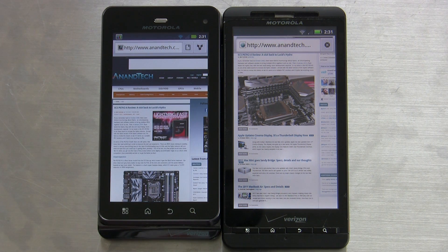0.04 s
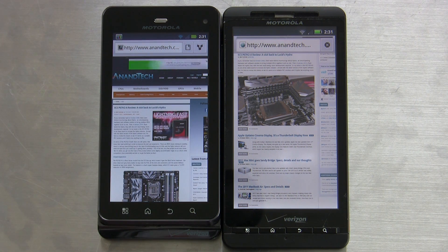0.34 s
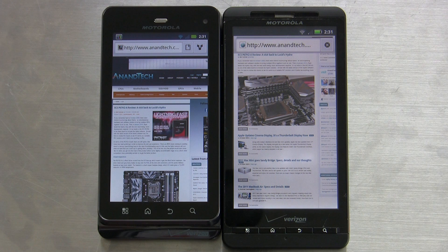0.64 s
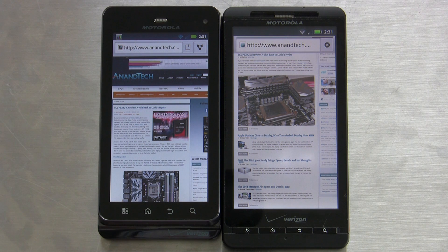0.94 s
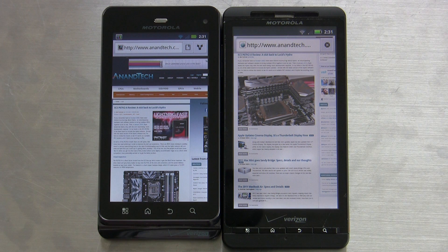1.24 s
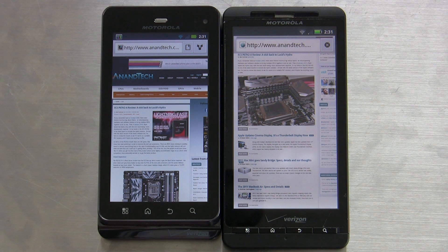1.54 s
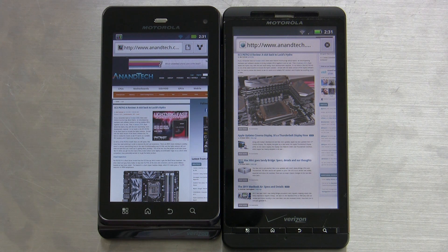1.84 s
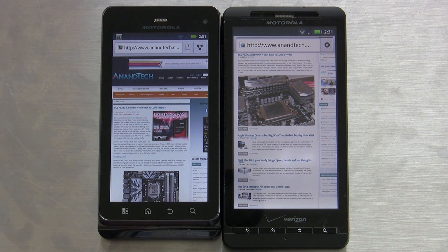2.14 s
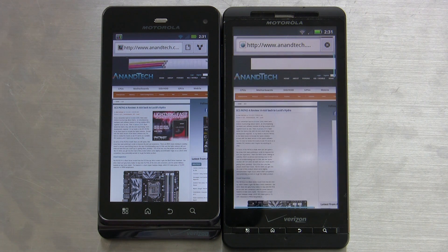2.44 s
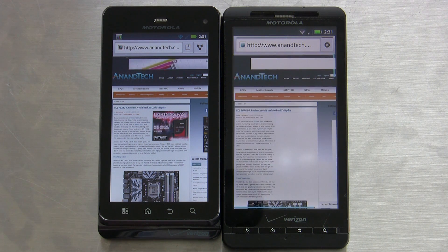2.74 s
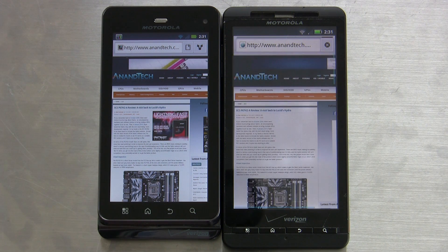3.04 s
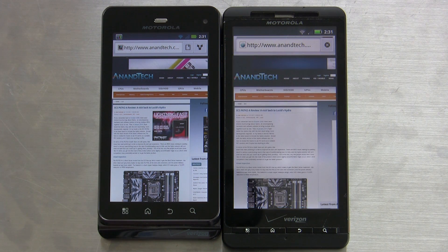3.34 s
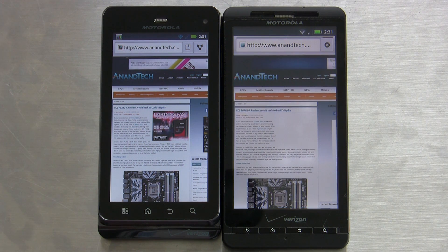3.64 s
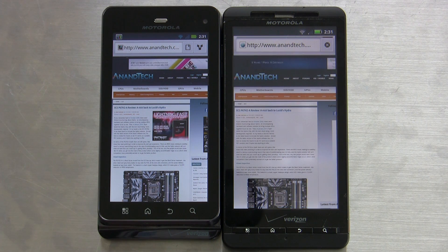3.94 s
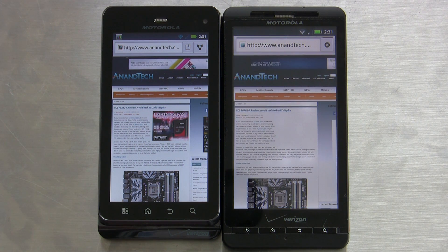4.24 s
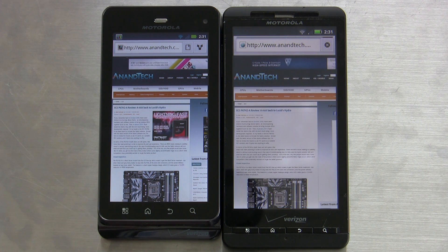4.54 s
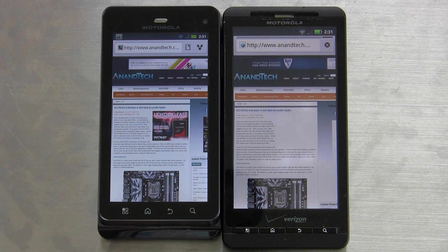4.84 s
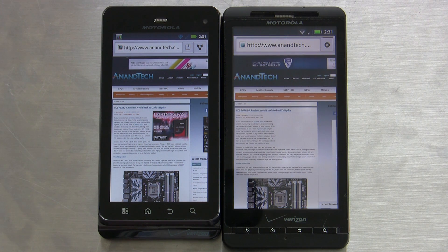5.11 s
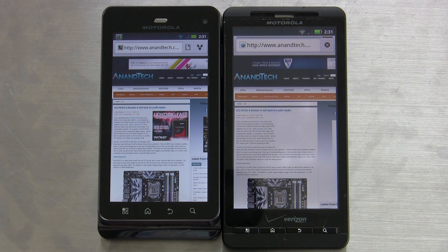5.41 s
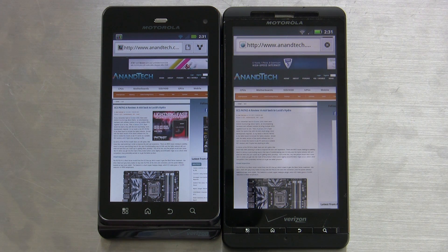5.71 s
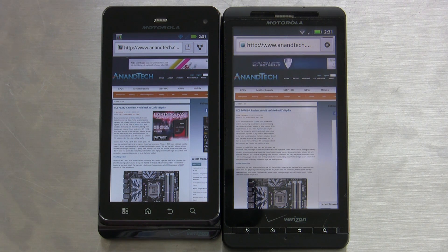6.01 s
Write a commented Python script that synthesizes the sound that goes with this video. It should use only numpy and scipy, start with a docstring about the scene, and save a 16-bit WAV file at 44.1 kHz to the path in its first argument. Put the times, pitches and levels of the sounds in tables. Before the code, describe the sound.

Low, wavering ventilation hum and rumble fill a quiet room, with soft airflow, thin hiss and two faint ticks.

```python
"""A ventilation blower drones in its duct: three wavering notes that beat, swell and sink.
Under it, duct rumble booms in the low modes of a quiet room and air rushes softly from the vents.
Mains hum and small fan tones hold nearly steady behind them, and two faint ticks sound early on.
The stereo microphone adds its own thin hiss."""
import sys
import numpy as np
from scipy import signal
from scipy.fft import rfft, irfft
from scipy.io import wavfile
from scipy.ndimage import uniform_filter1d

SR = 44100
rng = np.random.default_rng(int(sys.argv[2]) if len(sys.argv) > 2 else 0)


def pcm_store(signal):
    """Save signal as 16-bit PCM."""
    levels = np.round(np.clip(np.atleast_2d(signal), -1, 1) * 32767)
    wavfile.write(sys.argv[1], SR, levels.astype(np.int16).T)


N = 272097
TIME, FREQS = np.arange(N) / SR, np.fft.rfftfreq(N, 1 / SR)


def gain_of(db):
    """Decibels to amplitude."""
    return 10 ** (np.asarray(db) / 20)


def unit_rms(x):
    """Normalises to rms 1."""
    return x / np.sqrt(np.mean(x ** 2) + 1e-20)


def over_spectrum(points):
    """Joins (frequency, value) points on a log-frequency axis."""
    hz, value = np.transpose(points)
    return np.interp(np.log(FREQS + 1), np.log(hz + 1), value)


def resonances(modes):
    """EQ curve of a bank of resonant peaks, summed in power."""
    powers = (gain_of(db) ** 2 / (1 + ((FREQS - hz) / (0.91 * width)) ** 2) ** 2
              for hz, width, db in modes)
    return np.sqrt(sum(powers))


def stereo_noise(colour, correlation):
    """Mid/side noise of rms 1 with a given EQ curve and left-right correlation."""
    mid, side = rfft(rng.standard_normal((2, N)))
    mid, side = mid * np.sqrt(1 + correlation), side * np.sqrt(1 - correlation)
    return unit_rms(irfft(colour * np.array([mid + side, mid - side]), N))


def drift(rate_hz, size=2048):
    """Slow random modulator of rms 1."""
    hz = np.fft.rfftfreq(size, N / SR / size)
    slow = irfft(rfft(rng.standard_normal(size)) * np.exp(-(hz / rate_hz) ** 2) * (hz > 0))
    return np.interp(TIME, np.linspace(0, N / SR, size), unit_rms(slow))


def tone(hz, db, wander_hz, flutter_db, flutter_hz, left_lead=0):
    """A stereo sine whose pitch and level wander a little."""
    pitch = hz + wander_hz * drift(rate_hz=2.92)
    phase = 2 * np.pi * (np.cumsum(pitch) / SR + rng.random())
    amplitude = np.sqrt(2) * gain_of(db + flutter_db * drift(flutter_hz))
    return amplitude * np.sin([phase + left_lead, phase])


def swell(curve, depth=1.0):
    """Fader ride: follows a level curve about its mean, with the dB swings scaled by depth."""
    times, db = np.transpose(curve)
    return gain_of(depth * np.interp(TIME, times, db - db.mean()))


def steadied(noise, span_s=0.3, amount=0.7):
    """Partly levels the slow power of a noise, as a blower at constant speed feeds it."""
    power = uniform_filter1d((noise ** 2).mean(0), int(span_s * SR))
    return unit_rms(noise / np.sqrt(power) ** amount)


# Cues for the faint ticks: (time [s], gain [dB], centre [Hz], decay [s])
TICK_CUES = [(1.2298, -51.5, 3700, .0025), (1.3249, -41.5, 1850, .0007)]

def ticks(log_width=0.72, snap=3.1):
    """Dry little clicks: a sharp snap and a band of noise gone in milliseconds."""
    out = np.zeros(N)
    for start, db, hz, decay_s in TICK_CUES:
        burst = rng.standard_normal(N) * (TIME >= start) * np.exp(-abs(TIME - start) / decay_s)
        burst[round(start * SR)] = snap
        band = np.exp(-(np.log((FREQS + 1) / hz) / log_width) ** 2 / 2)
        rolloff = np.exp(-FREQS / (2 * hz))
        out += gain_of(db) * irfft(rfft(burst) * unit_rms(band * rolloff), N)
    return out


# Blade tones of small fans: (pitch [Hz], rms level [dB], left phase lead [rad])
BLADE_TONES = [(254.7, -54.5, 0.07), (509.3, -56, 0.1), (617, -56, 0.098), (634, -62, 0.043),
               (748.5, -64.5, 0.038), (1144, -72.5, 0)]

def fans():
    """Blade tones that waver slightly with the speed of each fan, and gently rise and fade."""
    return sum(tone(hz, db, wander_hz=0.44, flutter_db=2.0, flutter_hz=2.7, left_lead=lead)
               for hz, db, lead in BLADE_TONES)


# Hum of mains equipment: (harmonic number, rms level [dB], signed flutter depth [dB])
HUM_HARMONICS = [(2, -53, -2), (6, -55.5, 2.5), (8, -53, -0.2)]

def mains_hum(mains_hz=60):
    """Even harmonics of the mains, all but locked in pitch, each fluttering by its own amount."""
    return sum(tone(harmonic * mains_hz, db, wander_hz=0.017, flutter_db=depth, flutter_hz=5.5)
               for harmonic, db, depth in HUM_HARMONICS)


# Dark EQ of the rushing air: (frequency [Hz], relative level [dB])
AIR_EQ = [(10, -32), (24, -7), (45, -1.5), (110, -3.5), (240, -7), (320, -10), (500, -9), (700, -11.5),
          (850, -15.5), (1100, -17.5), (1500, -22.5), (2000, -25.5), (2600, -30), (4500, -33.5),
          (8000, -48.5), (16000, -55)]
# Stereo image of the air at the two capsules: (frequency [Hz], left-right correlation)
AIR_IMAGE = [(30, 1), (150, 0.91), (300, 0.51), (550, 0.5), (1000, 0.54), (1500, 0.35), (2500, 0.067),
             (5000, -0.19), (8000, 0.58)]
# Vent resonances that make the rush hollow: (centre [Hz], width [Hz], relative peak [dB])
VENT_PEAKS = [(391.5, 13.6, 1.5), (397, 16, -4), (451.4, 9.7, 5), (514.3, 6, 6.5), (556.5, 16, 0),
              (668, 4.4, 3.5), (764, 29, -5.5), (997, 50, -11), (1310, 31, -14)]

def vent_air():
    """A diffuse, gently wavering bed of air, mono in the lows and wider where the waves are short."""
    rush = gain_of(-42.5) * stereo_noise(gain_of(over_spectrum(AIR_EQ)), over_spectrum(AIR_IMAGE))
    hollow = gain_of(-50) * stereo_noise(resonances(VENT_PEAKS), correlation=0.99)
    return (rush + hollow) * gain_of(0.48 * drift(rate_hz=4.8))


# Low room modes that the duct rumble excites: (centre [Hz], width [Hz], relative peak [dB])
ROOM_PEAKS = [(38.6, 11.2, -7), (72.3, 7.6, -4.5), (93.4, 5.5, -5.5), (173.6, 10, -13), (191.4, 5.3, -5.5),
              (209.3, 5.1, -8), (222.9, 3.86, -3.5), (241, 3.4, -10), (254.9, 13.7, -7.5),
              (268.2, 3.1, -12.5)]
# Fader ride on the deep bass: (time [s], relative level [dB])
BASS_RIDE = [(0, -35), (0.38, -39), (0.62, -35.5), (1.02, -38.5), (1.35, -32.5), (1.68, -41.5), (1.92, -34),
             (2.15, -42), (2.65, -36), (2.92, -39.5), (3.15, -38), (3.55, -40), (3.8, -38), (4.1, -41),
             (4.65, -36.5), (5.05, -41), (5.4, -35), (6.17, -41.5)]

def duct_rumble(split_hz=140):
    """Turbulence rings the room's low modes; such long waves arrive near mono, and the bass heaves."""
    bass = stereo_noise(resonances([m for m in ROOM_PEAKS if m[0] < split_hz]), correlation=0.97)
    boom = stereo_noise(resonances([m for m in ROOM_PEAKS if m[0] >= split_hz]), correlation=0.95)
    return gain_of(-41.5) * steadied(bass) * swell(BASS_RIDE) + gain_of(-42.5) * steadied(boom)


# Duct resonances the blower drones in: (pitch [Hz], wander [Hz], rms level before the ride [dB])
DUCT_NOTES = [(126.56, 1.64, -42), (138.6, 1.96, -45), (156.5, 2.68, -42.5)]
# Broad, noisy skirts of the duct's resonances: (centre [Hz], width [Hz], relative peak [dB])
DUCT_SKIRTS = [(124, 7.9, 11.5), (154.6, 8.8, 8)]
# Fader ride on the drone, before depth scaling: (time [s], relative level [dB])
DRONE_RIDE = [(0.0, -33.5), (0.57, -34.5), (0.69, -35.5), (0.83, -47), (0.93, -33), (1.07, -36.5),
              (1.36, -31.3), (1.52, -28.5), (1.7, -37), (1.92, -42.5), (2.29, -31), (2.57, -40), (3.0, -30),
              (3.38, -34.5), (3.87, -37.5), (4.03, -42.5), (4.17, -39), (4.46, -30.5), (4.72, -35),
              (4.85, -30), (5.03, -38.5), (5.2, -36), (5.6, -33), (5.8, -40), (5.95, -33.5), (6.17, -46)]

def blower_drone():
    """The blower holds three beating duct notes over turbulence; all swell about once a second."""
    notes = sum(tone(hz, db, wander_hz, flutter_db=1.0, flutter_hz=7.8)
                for hz, wander_hz, db in DUCT_NOTES)
    turbulence = gain_of(-42.5) * stereo_noise(resonances(DUCT_SKIRTS), correlation=0.97)
    return (notes + turbulence) * swell(DRONE_RIDE, depth=0.76)


def scene():
    """The full room tone, leaning a touch to the right."""
    mix = duct_rumble() + blower_drone() + vent_air() + mains_hum() + fans() + ticks()
    return mix * gain_of([[-0.18], [0.18]])


# EQ of the microphone's own hiss: (frequency [Hz], relative level [dB])
HISS_EQ = [(100, -1), (3000, -8.5), (6000, -1), (7600, 0.5), (8800, 3.5), (10200, -1.5), (12500, -5.5),
           (15700, -8.5)]
# Stereo image of the hiss: (frequency [Hz], left-right correlation)
HISS_IMAGE = [(3000, 0.31), (5500, -0.044), (7800, -0.64), (8800, -0.37), (10000, -0.1), (12500, -0.15),
              (15000, .06)]

def record(dry, cutoff_hz=15750):
    """The microphone adds hiss with a mild treble peak; then tiny end fades and a steep high cut."""
    hiss = gain_of(-61.5) * stereo_noise(gain_of(over_spectrum(HISS_EQ)), over_spectrum(HISS_IMAGE))
    fades = signal.windows.tukey(N, 0.0005)
    high_cut = signal.firwin(1023, cutoff_hz, window=("kaiser", 9), fs=SR)
    return signal.oaconvolve((dry + hiss) * fades, high_cut[None], "same")


dry = scene()
out = record(dry)
pcm_store(out)
```